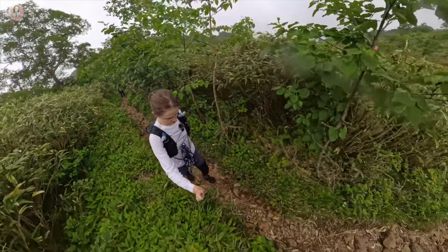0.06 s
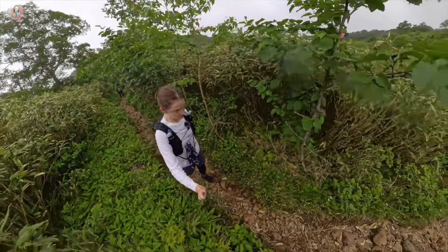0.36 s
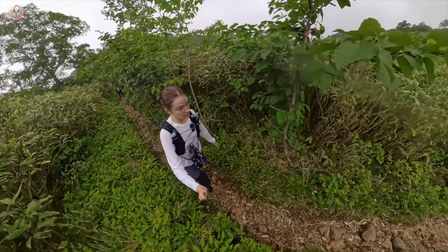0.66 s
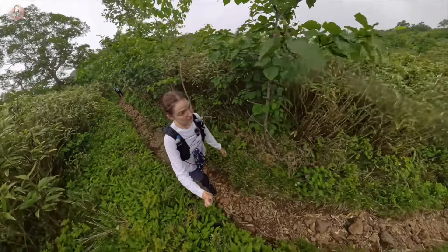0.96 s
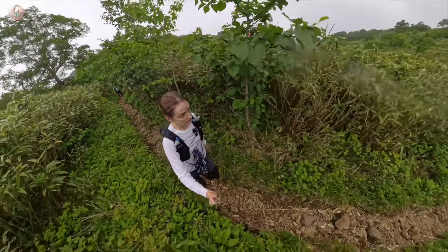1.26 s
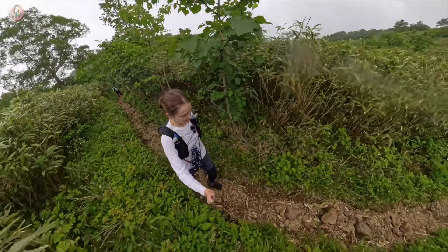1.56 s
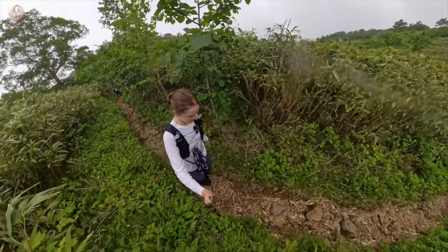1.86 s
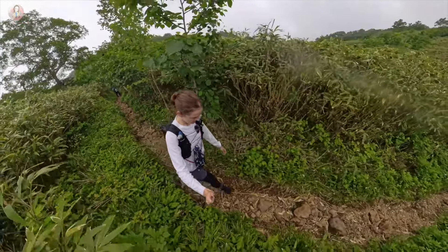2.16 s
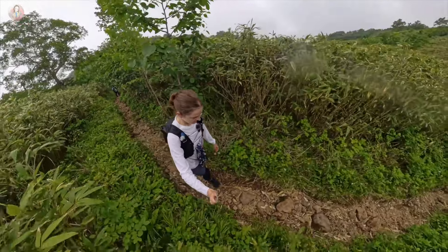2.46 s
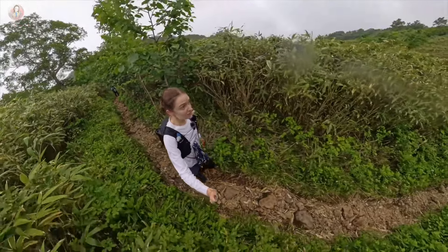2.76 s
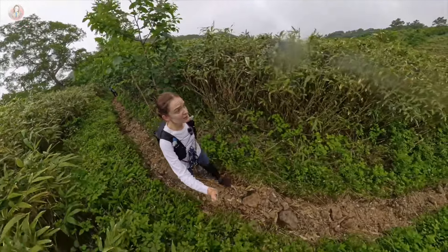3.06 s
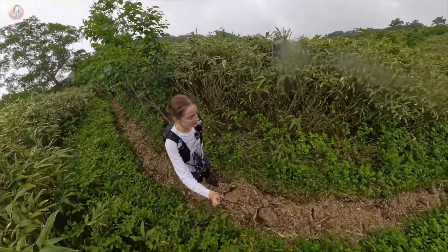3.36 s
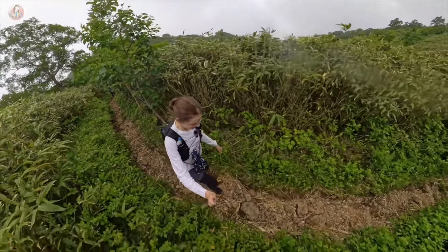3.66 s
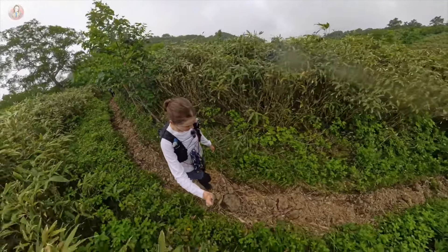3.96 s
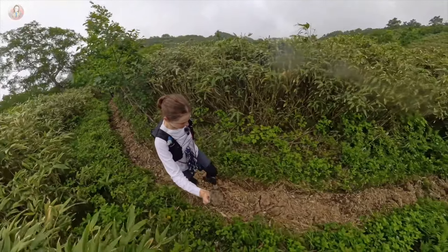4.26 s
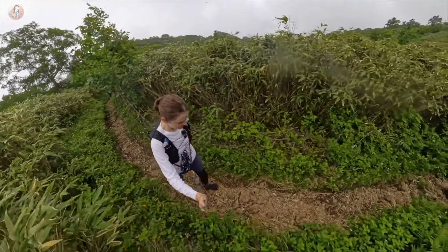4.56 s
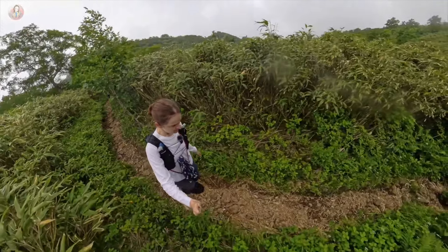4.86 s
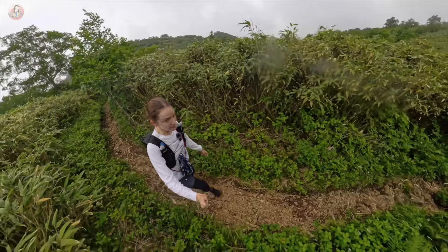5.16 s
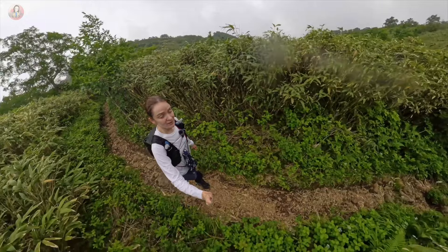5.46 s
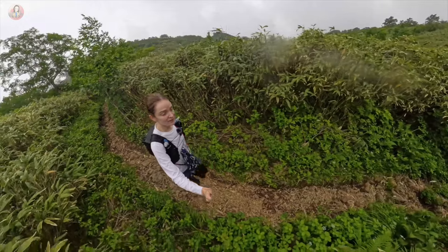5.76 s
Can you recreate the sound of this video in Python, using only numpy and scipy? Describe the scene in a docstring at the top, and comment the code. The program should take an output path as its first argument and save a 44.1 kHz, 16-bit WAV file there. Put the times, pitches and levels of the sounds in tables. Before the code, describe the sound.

Footsteps thud and crunch on a gritty path, with a twig snapping, as a songbird pours out quick whistles and trills.

```python
"""A dirt trail on a scrubby slope. A wren sings a long, quick song of whistles, zigzags and trills,
nearly pure tones from its syrinx, and the scrub scatters it back. A hiker walks down: heels thud,
soles crunch grit, stones knock, twigs snap and leaves brush over cloth. Other birds call far off.
A light wind rushes in the scrub and rumbles on the microphone."""
import sys
import numpy as np
from scipy import signal
from scipy.fft import rfft, irfft, next_fast_len
from scipy.io import wavfile
from scipy.ndimage import uniform_filter1d, map_coordinates

SR = 44100
rng = np.random.default_rng(int(sys.argv[2]) if len(sys.argv) > 2 else 0)


def generate_wav(sig):
    """Save sig (samples, or channels by samples) to the path in sys.argv[1] as 16-bit PCM at SR."""
    pcm = np.round(np.clip(np.atleast_2d(sig).T, -1, 1) * 32767).astype(np.int16)
    wavfile.write(sys.argv[1], SR, pcm)


N = 6 * SR


def amp(db):
    """Decibels to gain."""
    return 10 ** (np.asarray(db) / 20)


def unit_rms(x):
    """Scale to rms 1."""
    return x / np.sqrt(np.mean(x ** 2) + 1e-20)


def at_hz(points, hz):
    """Interpolate (Hz, value) points on a log frequency axis."""
    knots_hz, values = np.transpose(points)
    return np.interp(np.log(hz + 1), np.log(knots_hz + 1), values)


def curve(rows):
    """One value per sample from (seconds, value) rows."""
    return np.interp(np.arange(N) / SR, *np.transpose(rows))


def wobble(rate_hz, size):
    """Smooth random curve with rate_hz knots a second."""
    knots = rng.standard_normal(int(size * rate_hz / SR) + 4)
    return map_coordinates(knots, [np.arange(size) * rate_hz / SR])


def filtered(x, response):
    """Zero-phase filter; response maps Hz to gain."""
    size = next_fast_len(len(x) + SR // 4)
    hz = np.fft.rfftfreq(size, 1 / SR)
    return irfft(rfft(x, size) * response(hz), size)[:len(x)]


def noise(spectrum):
    """Noise of rms 1, coloured by (Hz, dB) points."""
    return unit_rms(filtered(rng.standard_normal(N), lambda hz: amp(at_hz(spectrum, hz))))


def add(track, start_s, sound):
    """Mix a sound into the track."""
    part = track[max(0, round(start_s * SR)):][:len(sound)]
    part += sound[:len(part)]


def swell(t, rise_s, fall_s):
    """Exponential rise to 1 at t = 0, then exponential decay."""
    return np.exp(-np.maximum(-t / rise_s, t / fall_s))


def whistle(length_s, pitch, level, waver=0.0018, flutter_db=-0.28, harmonic_db=-49):
    """One syrinx note: a nearly pure tone along (shares of length, Hz) and (shares of length, dB)."""
    attack_s, release_s = 0.002 + min(length_s, 0.08) / 14, 0.003
    t = np.arange(int((length_s + release_s) * SR)) / SR
    share = (t - release_s / 2) / length_s
    # muscles round off the corners of the glide
    hz = uniform_filter1d(np.interp(share, *pitch), size=len(t) // 12, mode="nearest")
    hz = hz * (1 + waver * wobble(400.7, len(t)))
    phase = 2 * np.pi * np.cumsum(hz) / SR
    ramp = np.clip(np.minimum(t / attack_s, (t[-1] - t) / release_s), 0, 1)
    gate = np.sin(np.pi / 2 * ramp) ** 2
    db = np.interp(share, *level) + flutter_db * wobble(110, len(t))
    return gate * amp(db) * (np.sin(phase) + amp(harmonic_db) * np.sin(2 * phase))


def wren():
    """Slurs and held notes link runs of repeated syllables and trills."""
    return slurs() + held_notes() + syllables() + trills()


# Downward slurs. Each row: start in seconds, length in seconds, top in Hz, bottom in Hz,
# relative level in dB, bend (under 1 drops early, over 1 late).
SLURS = [(0.125, .15, 7720, 7000, -25, 1.45), (.505, .072, 5830, 4980, -18.5, 1.03),
         (1.424, 0.21, 8800, 7025, -25.5, 0.34), (1.667, 0.064, 5340, 4340, -17.5, 1.01),
         (1.795, 0.02, 4970, 4105, -19, 0.89), (1.874, 0.022, 8720, 8000, -34, 0.72),
         (1.911, 0.018, 8800, 7830, -35, 1.3), (1.936, 0.053, 7450, 5175, -18.5, 0.55),
         (2.656, 0.038, 4520, 3873, -21, 1.22), (2.729, 0.048, 5065, 4735, -20, 1.09),
         (2.811, .019, 5260, 4210, -23.5, 1.32), (2.858, .046, 5855, 4770, -20, 1.7),
         (3.007, 0.036, 4300, 4060, -22, 1.1), (3.12, 0.053, 8650, 7540, -30, 0.82),
         (3.195, 0.034, 5130, 4703, -18.5, 0.85), (3.27, 0.017, 5120, 4155, -23, 0.69),
         (3.318, 0.055, 5710, 4948, -18, 0.5), (3.403, .054, 4420, 3857, -22.5, 1.5),
         (4.312, 0.068, 5685, 4885, -20.5, 1.32), (5.093, .04, 5240, 3920, -20.5, 1.26),
         (5.338, 0.041, 5080, 3800, -18.5, 1.3), (5.493, 0.14, 8760, 8320, -28.5, 0.6),
         (5.675, 0.067, 6760, 5066, -19, 1.23)]
# Slur envelope. Each row: share of length, gain in dB.
SLUR_SWELL = [(0, -5.5), (.5, 0), (1.002, -1.5)]


def slurs(gain_db_per_octave=5.5, scoop_depth=0.06, scoop_share=0.094):
    """Each whistle eases down in pitch and gains level; late-dropping ones first scoop up."""
    song, share = np.zeros(N), np.linspace(0, 1, 32)
    swell_db = np.interp(share, *np.transpose(SLUR_SWELL))
    for start_s, length_s, top_hz, bottom_hz, db, bend in SLURS:
        glide_hz = top_hz + (bottom_hz - top_hz) * np.sin(np.pi / 2 * share ** bend) ** 2
        scoop = scoop_depth * max(0, 2 * bend - 2) * np.exp(-share / scoop_share)
        hz = glide_hz * (1 - scoop)
        level_db = db + swell_db + gain_db_per_octave * np.log2(hz.mean() / hz)
        add(song, start_s - 0.001, whistle(length_s, (share, hz), (share, level_db)))
    return song


# Chips and long whistles. Each row: start in seconds, length in seconds, pitch in Hz,
# relative level in dB.
HELD_NOTES = [(0.324, 0.028, 3830, -23), (1.298, 0.038, 3600, -22.5), (1.774, 0.0064, 5266, -19.5),
              (1.889, .022, 8620, -27), (2.908, .018, 4874, -20), (2.962, 0.015, 3837, -20.5),
              (3.055, 0.02, 4135, -27), (3.251, 0.0073, 5370, -21), (3.507, 0.17, 6748, -18.5),
              (3.743, 0.013, 3720, -24.5), (5.177, 0.12, 5964, -22.5), (5.415, 0.013, 3587, -23.5),
              (5.772, 0.0069, 6200, -24), (5.893, 0.0075, 6020, -24.5)]
# Held-note envelope. Each row: share of length, gain in dB.
HELD_SWELL = [(0, -6.5), (.5, -1.5), (0.998, -1.5)]


def held_notes(scoop_depth=0.046, scoop_share=0.17):
    """Each note starts flat, scoops up to its pitch and stays there."""
    song, share = np.zeros(N), np.linspace(0, 1, 32)
    swell_share, swell_db = np.transpose(HELD_SWELL)
    scoop = scoop_depth * np.exp(-share / scoop_share)
    for start_s, length_s, hz, db in HELD_NOTES:
        note = whistle(length_s, (share, hz * (1 - scoop)), (swell_share, swell_db + db))
        add(song, start_s - 0.001, note)
    return song


# Syllable shapes. Each row: share of length, pitch in Hz, gain in dB.
FALL_SHAPE = [(0.0, 6430, 2.5), (0.1, 5860, -3.5), (0.22, 5195, 1.5), (0.43, 4435, -2), (0.73, 4100, -3),
              (1.0, 3716, -4)]
RISE_SHAPE = [(0.0, 4870, -6), (0.1, 5130, -6), (0.2, 4700, -17), (0.27, 4730, -12), (0.36, 4570, -10),
              (0.47, 5225, -5), (0.78, 5350, -3), (1.0, 6350, -27)]
ARCH_SHAPE = [(0.0, 6440, 1.5), (0.05, 6645, 5), (0.1, 6590, -21.5), (0.14, 6730, -5), (0.34, 7660, 0.5),
              (0.5, 8090, -8.5), (0.63, 7720, -4.5), (0.75, 6560, -3.5), (0.87, 6010, 2.5), (1.0, 5206, 6)]
LEAP_SHAPE = [(0.0, 4890, 9), (0.03, 5130, 1), (0.07, 4440, 0.5), (0.09, 4250, -19), (0.13, 4457, -1),
              (0.24, 5330, -0.5), (0.32, 6760, -11), (0.51, 8300, -7), (0.71, 7540, -9), (0.87, 6950, -6),
              (1.0, 6080, -4.5)]
HOOK_SHAPE = [(0.0, 8190, -7), (0.14, 7210, -4.5), (0.33, 6390, -6.5), (0.48, 6620, -2.5), (0.72, 6900, -3),
              (1.0, 6925, -8)]
# Repeats of each shape. Each row: start in seconds, length in seconds, relative level in dB.
FALLS = [(0.002, 0.052, -20.5), (0.706, 0.046, -20), (0.878, 0.048, -19.5), (1.048, 0.05, -20),
         (1.22, 0.048, -20.5)]
RISES = [(0.621, 0.06, -15), (0.792, 0.057, -13.5), (0.962, 0.057, -15), (1.134, 0.057, -16)]
ARCHES = [(2.03, 0.15, -23), (2.235, 0.16, -23), (2.446, 0.17, -25.5)]
LEAPS = [(4.431, 0.16, -23), (4.641, 0.18, -24.5), (4.869, 0.18, -23.5)]
HOOKS = [(5.807, 0.074, -24), (5.933, 0.0685, -22.5)]


def syllables():
    """Runs of repeated whistles, each kind with its own pitch and level contour."""
    song = np.zeros(N)
    runs = [(FALL_SHAPE, FALLS), (RISE_SHAPE, RISES), (ARCH_SHAPE, ARCHES),
            (LEAP_SHAPE, LEAPS), (HOOK_SHAPE, HOOKS)]
    for shape, repeats in runs:
        share, hz, shape_db = np.transpose(shape)
        for start_s, length_s, db in repeats:
            add(song, start_s - 0.001, whistle(length_s, (share, hz), (share, shape_db + db)))
    return song


# Trills. Each row: start in seconds, length in seconds, first pitch in Hz, target pitch in Hz,
# first relative level in dB, change over a full level ramp in dB.
TRILLS = [(.365, .105, 4087, 4203, -28.5, -2), (3.781, .49, 3900, 4195, -24.5, 3.5)]
# One pip. Each row: share of length, pitch ratio, gain in dB.
PIP_SHAPE = [(0, .91, -14), (.25, .98, -3), (.55, 1.01, 1), (.8, 1.01, 0), (1, .98, -5)]


def trills(pip_s=0.014, first_period_s=0.0303, slowing_s=0.000184, settle_s=0.067, ramp_s=0.32):
    """Quick pips slow a little as they climb in pitch and swell or fade."""
    song = np.zeros(N)
    share, ratio, pip_db = np.transpose(PIP_SHAPE)
    for start_s, length_s, first_hz, target_hz, first_db, change_db in TRILLS:
        age_s, period_s = 0, first_period_s
        while age_s < length_s:
            hz = target_hz + (first_hz - target_hz) * np.exp(-age_s / settle_s)
            hz *= 1 + 0.0055 * rng.standard_normal()
            db = first_db + change_db * min(1, age_s / ramp_s) + 0.4 * rng.standard_normal()
            add(song, start_s + age_s, whistle(pip_s, (share, hz * ratio), (share, pip_db + db)))
            age_s += period_s
            period_s += slowing_s
    return song


# Footfalls. Each row: time in seconds, relative grit level in dB, grit settling time in seconds,
# thud level in dB, thud pitch in Hz.
STEPS = [(0.325, -31, .011, -19.5, 402), (0.931, -33.5, 0.013, -15.5, 435), (1.593, -27, .007, -17, 346),
         (2.393, -19.5, 0.0085, -17, 365), (3.04, -62.5, 0.015, -26.5, 150),
         (3.267, -27.5, 0.011, -14, 472), (3.799, -46.5, 0.036, -26, 160),
         (4.058, -41.5, 0.0095, -40.5, 600), (4.222, -44.5, .006, -44, 600), (4.584, -21, 0.018, 2, 529),
         (4.82, -27, 0.011, -9, 1000), (5.29, -47.5, 0.014, -27, 310)]


def footsteps(rise_ratio=0.69):
    """The heel thuds and the sole crushes grit; the weight on it sets the energy."""
    track, t = np.zeros(N), np.arange(-SR // 16, SR // 8) / SR
    for time_s, grit_db, settle_s, thud_db, thud_hz in STEPS:
        weight = swell(t, rise_ratio * settle_s, settle_s)
        weight_rms = np.sqrt(np.mean(weight ** 2))
        grit = weight_rms * unit_rms(weight * crunch(t))
        add(track, time_s + t[0], amp(grit_db) * grit)
        add(track, time_s, amp(thud_db) * ring(thud_hz))
    return track


# Muffling by damp soil. Each row: frequency in Hz, gain in dB.
SOIL_RESPONSE = [(60, -1.5), (170, -2.5), (350, -1.5), (800, -2), (1700, -0.5), (2300, -17), (4000, -15),
                 (9000, -31.5)]


def crunch(t, median_hz=777, count=230, log_spread=0.7, decay_cycles=1.2):
    """Grit gives way: short damped grains of scattered pitch and size, heard through the soil."""
    onset_s = rng.uniform(t[0], t[-1], (count, 1))
    hz = median_hz * np.exp(log_spread * rng.standard_normal((count, 1)))
    size = rng.choice([-1, 1], (count, 1)) * rng.uniform(0.11, 1, (count, 1)) * np.sqrt(hz)
    age_s = np.arange(SR // 80) / SR
    grains = size * np.sin(2 * np.pi * hz * age_s) * np.exp(-hz * age_s / decay_cycles)
    indices = ((onset_s - t[0]) * SR).astype(int) + np.arange(len(age_s))
    grit = np.bincount(indices.ravel(), grains.ravel(), len(t))[:len(t)]
    return filtered(grit, lambda f: amp(at_hz(SOIL_RESPONSE, f)))


def ring(hz, t60_cycles=10.8):
    """Struck soil, stone or twig rings for a few cycles."""
    cycles = hz * np.arange(SR // 10) / SR
    attack = 1 - np.exp(-2 * cycles)
    return attack * np.sin(2 * np.pi * cycles) * amp(-60 * cycles / t60_cycles)


# Loose stones and snapping twigs. Each row: time in seconds, level in dB, ring pitch in Hz,
# relative crack level in dB.
KNOCKS = [(3.384, -44.5, 7270, 3), (4.557, -12.5, 803, -3), (4.569, 0, 4060, -9.5), (4.5697, -3, 498, -19),
          (4.8, -1, 1490, -45), (4.862, -1.5, 4750, -20)]


def knocks(crack_t60_s=0.014, crack_cutoff_hz=6000):
    """A stone or twig cracks briefly and rings."""
    track, t = np.zeros(N), np.arange(SR // 10) / SR
    lowpass = signal.butter(1, crack_cutoff_hz, fs=SR)
    for time_s, db, hz, crack_db in KNOCKS:
        crack = amp(crack_db - 60 * t / crack_t60_s) * rng.standard_normal(len(t))
        add(track, time_s, amp(db) * (ring(hz) + signal.lfilter(*lowpass, crack)))
    return track


# Strokes of leaves on clothing. Each row: peak time in seconds, level in dB, fall time in seconds.
BRUSHES = [(0.647, -49, 0.048), (0.772, -44.5, 0.026), (.846, -49, 0.036), (.942, -55.5, .04),
           (2.402, -45, 0.029), (3.26, -49, 0.034), (3.38, -43.5, 0.054), (4.58, -25, 0.017),
           (4.629, -48.5, 0.074), (4.828, -38.5, 0.015), (4.87, -28, 0.0095), (4.932, -40.5, 0.037),
           (5.436, -45.5, 0.041)]
# Leaf rustle. Each row: frequency in Hz, relative density in dB.
LEAF_SPECTRUM = [(200, -4), (700, -2), (1600, -1), (2600, -2), (4500, 4.5), (8000, 3.5), (11000, -4),
                 (15500, -12)]


def brushes(rise_ratio=0.65, grain_db=2.0, clump_db=3.5):
    """Leaves slide over cloth in swells of fine, clumped crackle."""
    t = np.arange(N) / SR
    strokes = sum(amp(db) * swell(t - peak_s, rise_ratio * fall_s, fall_s)
                  for peak_s, db, fall_s in BRUSHES)
    crackle = noise(LEAF_SPECTRUM) * amp(grain_db * wobble(1200, N) + clump_db * wobble(110, N))
    return strokes * unit_rms(crackle)


# Single far calls. Each row: start in seconds, length in seconds, first pitch in Hz,
# last pitch in Hz, relative level in dB.
FAR_CALLS = [(.215, 0.017, 3510, 3550, -48), (.517, 0.028, 1570, 1840, -57),
             (.851, 0.058, 3750, 3180, -45.5), (3.3, 0.48, 916, 890, -72.5),
             (3.429, 0.016, 2770, 2856, -51.5), (3.468, 0.72, 1701, 1723, -69),
             (3.757, 0.027, 2320, 2183, -54.5), (3.97, 0.053, 1670, 1761, -53),
             (4.759, .025, 3530, 3530, -49), (5.025, 0.04, 3040, 3282, -49),
             (5.529, 0.074, 3940, 3260, -49)]
# A far warbler's phrases. Each row: start in seconds, length in seconds, relative level in dB.
WARBLES = [(0.219, .12, -61.5), (.42, .22, -52.5), (4.808, .1, -53), (5.193, .19, -53.5), (5.589, .05, -51)]


def far_birds(period_s=0.075, note_s=0.045, top_hz=3477, bottom_hz=3010, pitch_scatter=0.058):
    """Glides and runs of falling notes from further along the slope, blurred by moving air."""
    calls, notes = np.zeros(N), list(FAR_CALLS)
    for start_s, length_s, db in WARBLES:
        beats_s = np.arange(start_s, start_s + length_s, period_s)
        for beat_s, (late, sharp) in zip(beats_s, rng.standard_normal((32, 2))):
            ratio = 1 + pitch_scatter * sharp
            notes.append((beat_s + late * period_s / 10, note_s, ratio * top_hz, ratio * bottom_hz, db))
    for start_s, length_s, first_hz, last_hz, db in notes:
        pitch, level = ([0, 1], [first_hz, last_hz]), ([0, 1], [db, db])
        add(calls, start_s, whistle(length_s, pitch, level, waver=0.02, flutter_db=3))
    return calls


# Echo decay on the slope. Each row: frequency in Hz, time to fall 60 dB in seconds.
SLOPE_T60 = [(500, 0.37), (3500, 0.66), (5300, 0.67), (7000, 0.43), (8500, 0.51), (15000, 0.05)]


def scrub_echo(x, near_db, far_db, near_t60_s=0.16, onset_s=0.0014):
    """Near bushes give a quick dense echo, the slope a longer, fainter one."""
    hz, frame_s, spectra = signal.stft(rng.standard_normal(SR * 3 // 4), SR, nperseg=256)
    decay = amp(-60 * frame_s / at_hz(SLOPE_T60, hz)[:, None])
    far = signal.istft(spectra * decay, SR, nperseg=256)[1]
    t = np.arange(len(far)) / SR
    near = rng.standard_normal(len(t)) * amp(-60 * t / near_t60_s) * (1 - np.exp(-t / onset_s))
    impulse = amp(near_db) * near / np.linalg.norm(near) + amp(far_db) * far / np.linalg.norm(far)
    return signal.fftconvolve(x, impulse)[:N]


# Strength of the buffeting and of the breeze. Each row: time in seconds, relative level in dB.
BUFFET_LEVEL = [(0, -39), (1.5, -35), (3.2, -36), (3.8, -36.5), (4.3, -32.5), (4.7, -28), (5.3, -29),
                (5.8, -23.5), (6, -25)]
BREEZE_LEVEL = [(0.0, -61), (0.77, -55), (1.94, -61), (4.9, -51.5), (5.1, -57), (6.0, -57.5)]
# Their spectra. Each row: frequency in Hz, relative density in dB.
BUFFET_SPECTRUM = [(10, 2), (25, -2), (40, -12), (60, -20.5), (100, -18), (160, -26.5), (250, -46.5),
                   (500, -53), (1500, -82.5)]
BREEZE_SPECTRUM = [(30, -1), (90, 6), (160, 7), (260, -2.5), (400, -2.5), (700, -13.5), (1200, -14.5),
                   (1800, -18.5), (2400, -25.5), (4000, -18.5), (7000, -38), (9000, -49.5), (15000, -68)]


def wind(gust_db=1.5, breeze_gain_db=2.5):
    """Air buffets the microphone and rushes softly through the scrub."""
    buffet_db = curve(BUFFET_LEVEL) + gust_db * wobble(10, N)
    buffet = amp(buffet_db) * noise(BUFFET_SPECTRUM)
    breeze_db = curve(BREEZE_LEVEL) + breeze_gain_db + gust_db * wobble(21, N)
    return buffet + amp(breeze_db) * noise(BREEZE_SPECTRUM)


def scene():
    """Mono mix: the hiker close and nearly dry, the birds wrapped in echoes, wind behind."""
    song, distant = amp(-1) * wren(), amp(3) * far_birds()
    hiker = footsteps() + knocks() + brushes()
    echoes = scrub_echo(song, near_db=-3.5, far_db=-17)
    echoes += scrub_echo(distant, near_db=-2, far_db=-9)
    echoes += scrub_echo(hiker, near_db=-22, far_db=-30)
    return (song + distant + hiker + echoes + wind())[None]


# Uneven microphone treble. Each row: frequency in Hz, gain in dB.
MIC_RESPONSE = [(7800, 0.5), (8500, -2.5), (9200, -4), (10800, 2), (13000, -4), (15000, -1)]


def record(dry, cutoff_hz=15900, transition_hz=700):
    """The microphone colours the treble; a band limit removes the very top."""
    def response(hz):
        ramp = np.clip((cutoff_hz - hz) / transition_hz + 0.5, 0, 1)
        return amp(at_hz(MIC_RESPONSE, hz)) * np.sin(np.pi / 2 * ramp) ** 2
    return np.array([filtered(channel, response) for channel in dry])


dry = scene()
out = record(dry)
generate_wav(out)
```